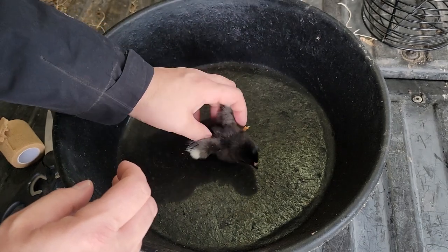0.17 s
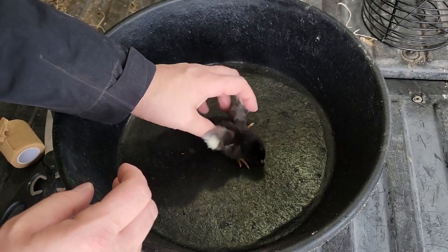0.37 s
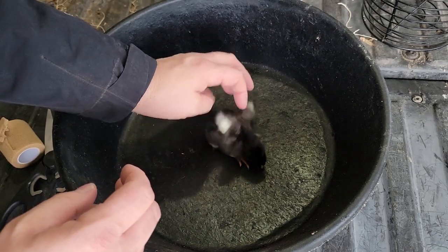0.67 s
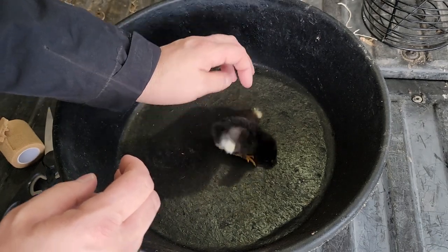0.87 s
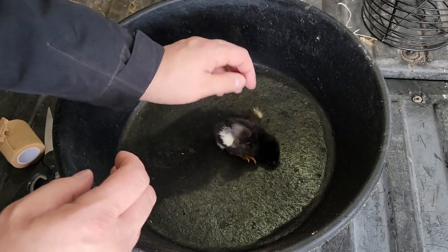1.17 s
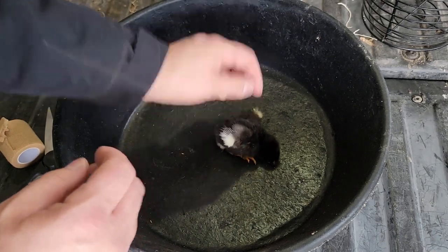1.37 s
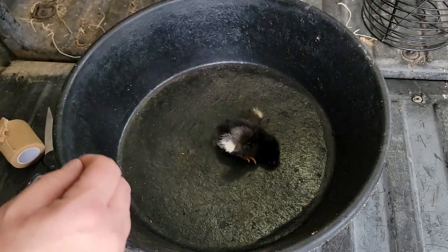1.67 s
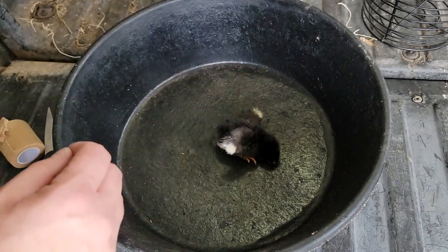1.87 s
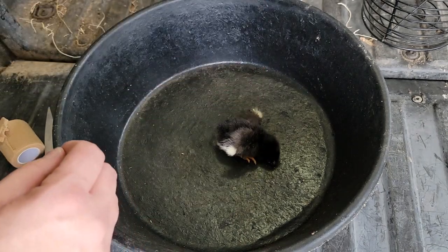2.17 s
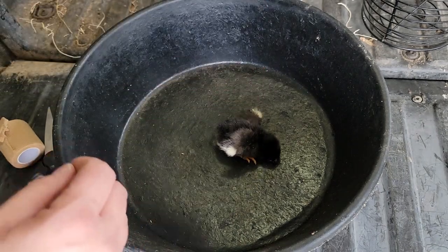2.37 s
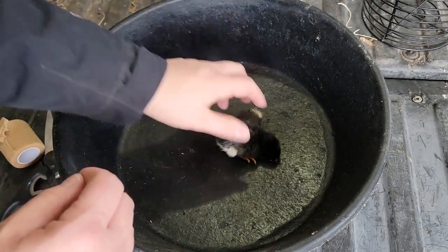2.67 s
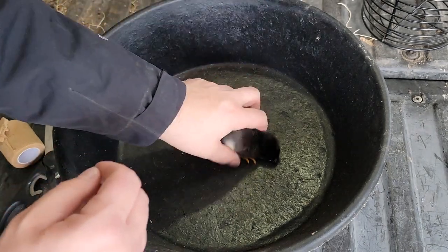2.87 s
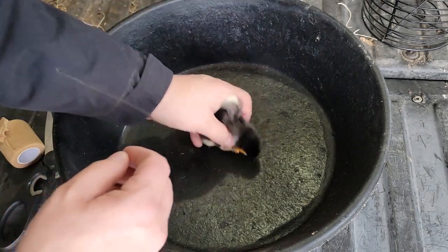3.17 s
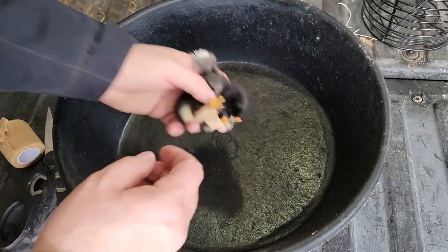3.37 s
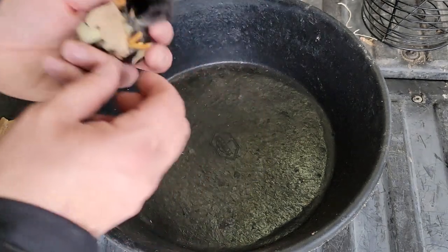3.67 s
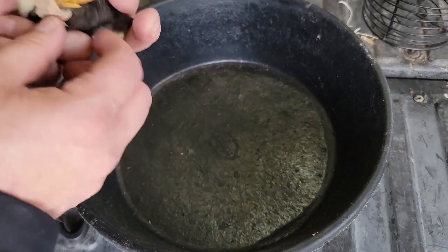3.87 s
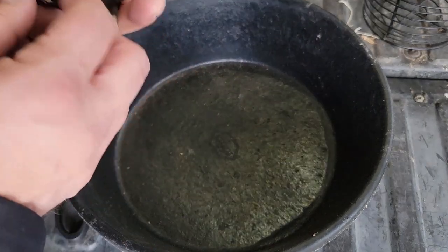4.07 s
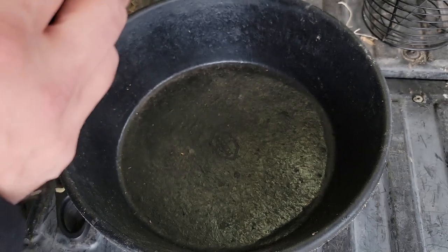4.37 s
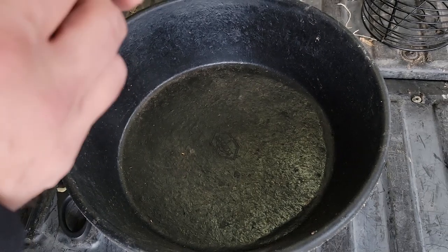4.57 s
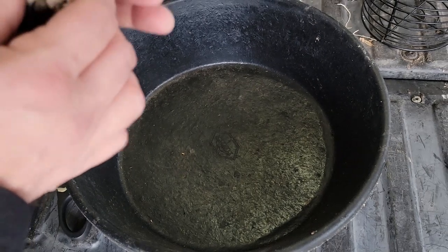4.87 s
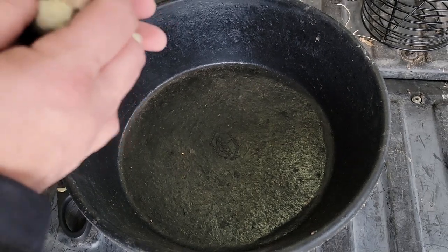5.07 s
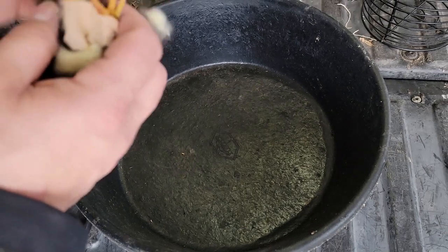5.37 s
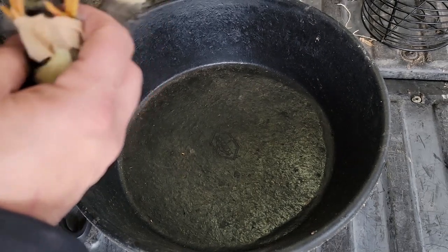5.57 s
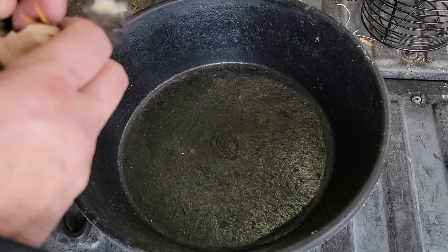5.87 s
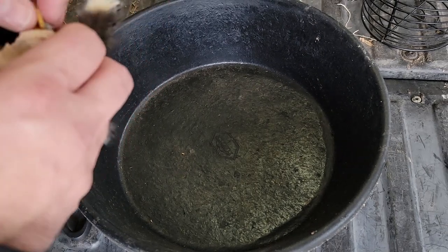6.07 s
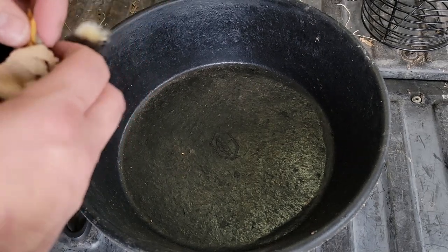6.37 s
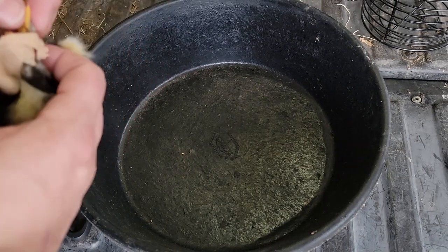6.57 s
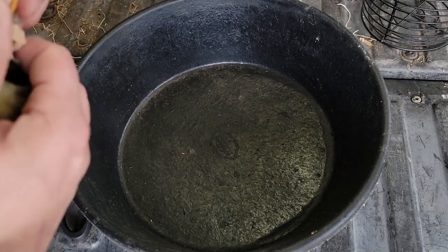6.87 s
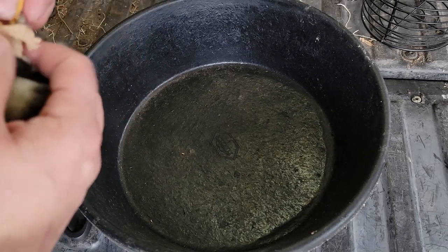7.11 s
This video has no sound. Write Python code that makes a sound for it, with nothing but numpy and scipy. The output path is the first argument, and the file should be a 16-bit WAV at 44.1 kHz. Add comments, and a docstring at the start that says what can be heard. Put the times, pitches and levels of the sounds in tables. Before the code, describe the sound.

A young chick gives short, sharp, falling peeps at uneven intervals, with soft knocks on a rubber tub, light rustling and faint room echo.

```python
"""A young chick peeps in a rubber tub and then in cupped hands, in a small shed, left of a pair of microphone ports.
Each peep is a whistle on a pitch curve, with weak overtones, half-pitch lines and a flutter; faint whistles glide.
Soft knocks on the tub and its stand ring damped modes; rustle, rubbing and bursts of hiss are grainy banded noise.
Rumble, hum, hiss and a faint drone are filtered noise; decaying noise gives the echoes of tub and shed."""
import sys
import numpy as np
from scipy import signal
from scipy.fft import rfft, irfft, next_fast_len
from scipy.io import wavfile
from scipy.ndimage import uniform_filter1d

SR = 44100
rng = np.random.default_rng(int(sys.argv[2]) if len(sys.argv) > 2 else 0)


def master_out(mix):
    """Clip the mix to full scale and print it as 16-bit PCM to the path in sys.argv[1]."""
    frames = np.transpose(np.atleast_2d(mix))
    ceiling = np.clip(frames, -1, 1)
    pcm = np.round(ceiling * 32767).astype(np.int16)
    wavfile.write(sys.argv[1], SR, pcm)


N = 319284
CUTOFF_HZ = 15950   # top of the passed range
RELEASE_S = .004    # tail after the close station


def from_db(db):
    """Gain of a level."""
    return 10 ** (np.asarray(db) / 20)


def rms_one(x):
    """Scaled to rms 1."""
    return x / np.sqrt(np.mean(x ** 2) + 1e-20)


def at_hz(points, hz):
    """A spectrum read on a log-frequency axis."""
    points = np.array(points)
    return np.interp(np.log(hz), np.log(points[:, 0]), points[:, 1])


def drift(hz):
    """Slow chance: noise twice through a one-pole low-pass; spread 1."""
    r = np.exp(-2 * np.pi * hz / SR)
    noise = rng.standard_normal(N + SR)
    return rms_one(signal.lfilter([1], [1, -2 * r, r * r], noise)[SR:])


def panned(x, pan_db):
    """The left keeps the level, the right is weaker."""
    return np.array([x, x * from_db(-pan_db)])


def resonance(x, hz, width_hz):
    """Two-pole band-pass of gain about 1 at its top."""
    r = np.exp(-np.pi * width_hz / SR)
    zeros = (1 - r * r) / 2 * np.array([1, 0, -1])
    return signal.lfilter(zeros, [1, -2 * r * np.cos(2 * np.pi * hz / SR), r * r], x)


def banded(white, spectrum, patchy_db):
    """Narrow bands of a mid and side pair, each with its level, flicker, likeness and balance; rms 1."""
    # left-right likeness: f/Hz, correlation
    likeness = [(60, 0.88), (130, 0.72), (290, 0.065), (640, -0.53), (1410, -0.62), (3100, -0.025),
                (6820, -0.063), (15000, -0.094)]
    # channel balance: f/Hz, left minus right/dB
    balance = [(60, -2), (180, 3.5), (550, 3), (1650, -1), (4970, 1), (15000, 3.5)]
    out, edges_hz = 0, 22 * 2 ** np.arange(0, 9.9, .4)
    flickers = [drift(4.4), drift(4.8), drift(17)]
    for k, (low, high) in enumerate(zip(edges_hz, edges_hz[1:])):
        band = signal.butter(2, [low, high], "band", fs=SR, output="sos")
        mid, side = signal.sosfilt(band, white[k % 2])
        hz = np.sqrt(low * high)
        alike = np.clip(at_hz(likeness, hz), -1, 1)
        lean = from_db(at_hz(balance, hz) / 2)
        gain = from_db(at_hz(spectrum, hz) + patchy_db * flickers[k % 3])
        pair = np.sqrt(1 + alike) * mid + np.sqrt(1 - alike) * side * [[1], [-1]]
        out = out + gain * pair * [[lean], [1 / lean]]
    return rms_one(out)


def hum_and_hiss():
    """Steady floor of the shed: noise bands with a slow flicker."""
    # floor spectrum: f/Hz, density/dB per Hz
    floor = [(12, -37), (20, -5), (85, 3), (261, -15), (335, 3), (431, -22.5), (603, -13.5), (1110, -13),
             (1890, 3.5), (2180, -2.5), (3700, -0.5), (7030, -17.5), (8310, -56.5), (12600, -24.5),
             (15800, -31)]
    return from_db(-57) * banded(rng.standard_normal((2, 2, N)), floor, patchy_db=2.2)


def drone():
    """A narrow band in the hum: noise through one sharp resonance."""
    tone = rms_one(resonance(rng.standard_normal(N), hz=352, width_hz=12))
    return panned(from_db(-78) * tone, 4.0)


def stand_rumble():
    """The stand rumbles: noise through two equal low resonances, alike in both channels."""
    # rumble of the stand: t/s, level/dB
    levels = [(0, -71), (.3, -79), (1.2, -83), (1.6, -68), (2.15, -68), (2.35, -75), (2.95, -70),
              (3.4, -76), (3.8, -69), (4.3, -74), (5.2, -70), (5.4, -75), (5.7, -71), (6.0, -81),
              (6.15, -70), (6.45, -74), (6.95, -82), (7.24, -78)]
    low = resonance(resonance(rng.standard_normal(N), 81, 160), 81, 160)
    return from_db(np.interp(np.arange(N) / SR, *np.transpose(levels))) * rms_one(low)


def rustle_and_rub():
    """Rustle and hiss bursts are noise in dense small grains; rubbing on the tub is coarser and duller."""
    # bursts of rustle and of the hiss heard along with some peeps:
    # crest t/s, rise/s, fall/s, fine-grained level/dB, rubbing level/dB
    bursts = [(0.05, .6, .4, -65, -61), (0.3, .07, .08, -53, -60), (0.54, .2, .09, -60, -60.5),
              (0.83, .2, .1, -61, -65), (1.19, .06, .18, -57, -55), (1.63, .7, .3, -59.5, -50.5),
              (1.731, .17, .15, -47.5, -45.5), (1.94, .12, .5, -57.5, -56), (2.06, .4, .1, -60.5, -56),
              (2.17, .08, 1.1, -58.5, -57.5), (2.35, .5, .4, -62, -54), (2.8, 3.1, 2.1, -64, -59),
              (3.42, 2.1, 1.9, -60.5, -58), (3.81, 1.9, .9, -59.5, -56), (4.9, 1.6, 1.3, -57.5, -61),
              (5.21, .06, .18, -47.5, -61.5), (5.66, .3, .3, -52.5, -57.5), (5.991, .03, .3, -52, -61.5),
              (6.2, .4, .5, -61, -64), (6.46, .012, .24, -46.5, -59), (6.67, .1, .1, -54, -70),
              (6.98, .4, .08, -65.5, -69.5), (7.09, .08, .6, -65, -70)]
    # fine-grained spectrum: f/Hz, density/dB per Hz
    fine_spectrum = [(530, -26), (900, -40), (1580, -45), (2010, 0.5), (2490, -7), (2780, -9), (2980, -3.5),
                     (6660, 3), (8170, -19), (12900, -1), (15800, -4)]
    # rubbing spectrum: f/Hz, density/dB per Hz
    rub_spectrum = [(88, -47), (150, -16), (367, -3.5), (457, -1.5), (514, -1), (939, 1.5), (2070, 1),
                    (5000, -17), (6500, -46), (11000, -120)]
    swish_swing_db, rub_swing_db = 20, 15   # spanned in one rise or fall time
    t, swish_db, rub_db = np.arange(N) / SR, -120, -120
    for crest, rise, fall, fine_db, coarse_db in bursts:   # the strongest of the moment sets the level
        away = np.where(t < crest, (crest - t) / rise, (t - crest) / fall)
        swish_db = np.maximum(swish_db, fine_db - swish_swing_db * away)
        rub_db = np.maximum(rub_db, coarse_db - rub_swing_db * away)
    fine = rng.standard_normal((2, 2, N)) * from_db(1.4 * drift(1200))
    coarse = rng.standard_normal((2, 2, N)) * from_db(1.6 * drift(106))
    swish = from_db(swish_db) * banded(fine, fine_spectrum, patchy_db=1.7)
    return swish + from_db(rub_db) * banded(coarse, rub_spectrum, patchy_db=3.5)


def knocks():
    """Each blow rings the modes around the pitch that its hardness favours; flesh spreads the contact over two cycles."""
    # blows: t/s, nominal level/dB, most excited f/Hz (hardness)
    blows = [(0.738, -47, 2130), (0.788, -53, 266), (1.186, -56, 1120), (1.218, -60, 325),
             (1.533, -38, 1950), (1.578, -41, 573), (1.64, -39, 695), (1.647, -42, 740),
             (1.701, -38.5, 565), (1.709, -51, 520), (1.74, -31.5, 1980), (1.746, -34, 2210),
             (1.922, -45, 209), (2.056, -52, 2170), (2.259, -47.5, 246), (2.321, -45, 590),
             (2.354, -40, 2110), (2.491, -41.5, 1920), (2.718, -58, 134), (2.907, -43, 397),
             (2.958, -47, 71.6), (3.508, -58, 2480), (3.789, -27, 2600), (3.839, -51, 231),
             (4.09, -56, 350), (4.289, -41.5, 1830)]
    # modes of the tub and its stand: f/Hz, nominal level/dB, t60/s
    modes = [(75, 0, .3), (110, -2, .25), (200, 0, .12), (365, 0, .06), (430, 0, .04), (520, 0, .04),
             (735, 0, .03), (950, -4, .015), (1250, -4, .012), (1600, -2, .012), (2080, 0, .015),
             (2630, -1, .012), (3400, -5, .008), (4600, -9, .006), (6500, -13, .005)]
    s, blow_db, hard_hz = np.transpose(blows)
    at, out = (s * SR).astype(int), np.zeros(N)
    chance_db = rng.normal(0, 2.0, (len(s), len(modes)))
    for k, (hz, mode_db, t60) in enumerate(modes):
        octaves_off = np.abs(np.log2(hz / hard_hz))
        clicks = np.full(N, 1e-18)
        clicks[at] = from_db(blow_db + mode_db + chance_db[:, k] - 14.0 * octaves_off)
        r, w = from_db(-60 / (t60 * SR)), 2 * np.pi * hz / SR
        cycles = np.arange(int(2 * SR / hz))
        contact = np.hanning(len(cycles)) * np.cos(w * cycles) * 2 * hz / SR
        push = signal.oaconvolve(clicks, contact)[:N]
        out += signal.lfilter([0, np.sin(w)], [1, -2 * r * np.cos(w), r * r], push)
    return panned(out, 4.0)


def faint_whistles():
    """Short rough glides under a smooth swell: the direct part, and the feed that only arrives as echo."""
    # the end of a peep before the start, the chick's second voice, or farther chicks:
    # start t/s, end t/s, start f/Hz, end f/Hz, direct level/dB, echo feed level/dB, roughness (0-1)
    glides = [(0.0, 0.008, 3970, 3790, -39, -25.5, 0.33), (0.0, 0.013, 5300, 5200, -50, -36.5, 0.24),
              (0.195, 0.25, 4650, 5200, -58, -36.5, .4), (2.76, 2.902, 4400, 4000, -79, -42, 0.6),
              (3.0, 3.054, 4000, 3750, -53, -48, 0.8), (3.04, 3.092, 4100, 3020, -51, -46.5, 0.65),
              (3.079, 3.105, 2630, 2520, -52, -48.5, 0.4), (3.075, 3.101, 5300, 4970, -54, -48.5, 0.4),
              (4.04, 4.126, 4780, 3970, -61, -44.5, 0.64), (4.29, 4.391, 4860, 3740, -56, -40.5, .5),
              (5.598, 5.645, 3070, 3450, -37, -41.5, 0.65), (6.14, 6.202, 6620, 7200, -47.5, -40.5, .6),
              (6.13, 6.204, 3805, 3580, -46.5, -28.5, 0.82), (6.586, 6.632, 6350, 6120, -45.5, -44.5, .2),
              (6.87, 7.01, 5140, 3580, -56.5, -40, .5), (7.09, 7.148, 5300, 4040, -60, -49.5, 0.65),
              (7.185, 7.223, 5330, 5320, -53.5, -37.5, 0.13)]
    direct, echo, grit, waver = np.zeros(N), np.zeros(N), drift(380), drift(140)
    for start, end, from_hz, to_hz, level_db, echo_db, rough in glides:
        at = np.arange(round(max(start, 0) * SR), min(round(end * SR), N))
        hz = np.linspace(from_hz, to_hz, len(at)) * (1 + .05 * rough * waver[at])
        swell = np.sqrt(np.hanning(len(at)))
        glide = np.sin(2 * np.pi * np.cumsum(hz) / SR) * (1 + rough * grit[at]) * swell
        direct[at] += from_db(level_db) * glide
        echo[at] += from_db(echo_db) * glide
    return direct, echo


def peep_shape(times, pitches, arch_hz, levels_db):
    """Samples, pitch and level of a peep or part of one, walked from station to station."""
    open_under_db, release_db = 22, 25   # opening below the swell station; drop after the close
    ease = 1.6   # the first leg and the pitch of the third move fast at first, then settle
    end_s = times[-1] + RELEASE_S
    at = np.arange(round(times[0] * SR), round(end_s * SR))
    place = np.interp(at / SR, [*np.maximum.accumulate(times), end_s], np.arange(6))
    leg, share = np.divmod(place, 1)
    eased = leg + 1 - (1 - share) ** ease
    hz = np.interp(np.where(leg % 2 == 0, eased, place), np.arange(5), pitches)
    hz = hz + arch_hz * np.sin(np.pi * share) * (leg == 1)
    stations_db = [levels_db[0] - open_under_db, *levels_db, levels_db[-1] - release_db]
    level_db = np.interp(np.where(leg == 0, eased, place), np.arange(6), stations_db)
    return at, hz, level_db


def chick():
    """A whistle with weak overtones; uneven cycles add lines at half pitch, a flutter chops level and bends pitch."""
    # peeps and parts of peeps, each walked through five stations: open, swell, break, crest, close:
    # t/s at the five; nominal f/Hz at the five; pitch arch from swell to break/Hz;
    # level/dB at swell, break, crest, close; left minus right at 4 kHz/dB, extra lag of the right/us,
    # octave gain/dB, change of balance/dB per kHz
    peeps = [ (0.243, 0.258, 0.268, 0.276, 0.283, 5500, 5720, 5680, 5560, 5500, 10, -39, -34, -34, -36, 3, -160, -4.5, 6),
             (0.283, 0.292, 0.302, 0.314, 0.336, 5350, 5080, 4680, 4230, 3050, 10, -26, -25.5, -26, -40, 3, -160, -4.5, 6),
             (0.483, 0.516, 0.532, 0.543, 0.565, 5620, 5180, 4750, 4000, 2880, 40, -33, -38, -25, -32, 14, 60, 1, -3),
             (0.8, 0.835, 0.862, 0.872, 0.881, 5600, 5450, 5250, 4500, 3620, 70, -38, -35, -35, -33, 4, 75, -6, -4.5),
             (1.012, 1.05, 1.075, 1.086, 1.098, 5470, 5470, 5480, 4330, 3150, 10, -35, -33, -25, -25, 12, -190, -5.5, -6),
             (3.106, 3.128, 3.171, 3.181, 3.192, 3900, 5000, 5020, 3900, 3680, 80, -44, -39, -27, -34, 2.5, -185, -8, 3.5),
             (3.452, 3.463, 3.5, 3.511, 3.519, 5750, 5880, 5230, 4650, 4650, -280, -31, -28, -18, -27, 12.5, -180, -4, -5.5),
             (3.519, 3.524, 3.529, 3.532, 3.538, 4700, 4950, 5250, 5150, 4800, 10, -30, -34, -38, -50, 12.5, -180, -4, -5.5),
             (4.4, 4.432, 4.516, 4.527, 4.533, 5850, 5430, 5600, 4050, 4020, 50, -32, -35, -24, -26, 6.5, 25, -7, -4.5),
             (4.533, 4.543, 4.55, 4.557, 4.561, 4200, 5300, 5100, 3600, 3250, 40, -39, -42, -30, -32, 6.5, 25, -7, -4.5),
             (4.758, 4.775, 4.785, 4.791, 4.798, 5620, 5560, 5600, 5560, 5480, 10, -40, -33, -28, -36, 7.5, -25, 0, 0),
             (4.794, 4.812, 4.876, 4.898, 4.911, 5480, 5430, 5320, 3490, 2880, 270, -33.5, -36, -18, -26, 7, -25, 0, 0),
             (5.134, 5.162, 5.175, 5.19, 5.197, 5400, 5140, 5330, 5420, 5430, 10, -24, -24, -28, -31, 3, -30, -5.5, 3.5),
             (5.2, 5.204, 5.232, 5.246, 5.257, 5300, 5260, 5100, 3680, 2880, 30, -27, -30, -12.5, -23, 5.5, -30, -5.5, 3.5),
             (5.603, 5.616, 5.643, 5.655, 5.663, 5400, 5300, 5230, 5320, 5420, 10, -29, -25, -26, -28, 7.5, 25, -5.5, 0),
             (5.666, 5.671, 5.693, 5.712, 5.727, 5250, 5180, 4970, 3800, 4020, 40, -24, -25, -17, -23, 7.5, 25, -10, 0),
             (5.725, 5.729, 5.731, 5.734, 5.738, 4050, 4060, 3850, 3400, 3070, 10, -25, -24, -25, -30, 7.5, 25, -10, 0),
             (6.116, 6.128, 6.196, 6.207, 6.222, 6250, 6330, 5450, 3720, 2700, -360, -47, -43, -20, -27, 9, 45, 3.5, -2),
             (6.583, 6.607, 6.654, 6.666, 6.687, 5900, 5550, 5450, 4060, 2850, 120, -48, -43, -29, -35, 11, 30, 5, 6),
             ]
    # flutter: start t/s, end t/s, nominal rate/Hz, depth (0-1)
    flutters = [(0.262, 0.287, 280, .5), (0.515, 0.552, 200, .5), (1.08, 1.1, 190, .3),
                (3.12, 3.18, 200, .4), (3.45, 3.506, 230, .8), (3.518, 3.545, 260, .8),
                (4.468, 4.522, 230, .7), (4.84, 4.88, 220, .4), (4.895, 4.912, 300, .3),
                (5.125, 5.15, 250, .6), (5.2, 5.238, 215, .9), (5.605, 5.662, 180, .9),
                (5.668, 5.706, 170, .8), (6.12, 6.198, 200, .6), (6.2, 6.222, 150, .6),
                (6.59, 6.65, 300, .5)]
    # uneven cycles: start t/s, end t/s, half-pitch level/dB
    halves = [(0.512, 0.525, -51), (0.538, 0.552, -45), (1.04, 1.07, -60), (1.084, 1.092, -49),
              (3.138, 3.155, -50), (3.472, 3.506, -41), (4.42, 4.521, -48), (4.793, 4.884, -41),
              (4.892, 4.907, -43), (5.13, 5.156, -41), (5.176, 5.187, -44), (5.241, 5.256, -46),
              (5.608, 5.675, -46), (5.704, 5.724, -54)]
    # octave against the whistle: octave f/Hz, level/dB
    octave = [(5500, -28.5), (7000, -16), (7700, -33), (8300, -34), (9500, -28), (10500, -19), (11500, -33)]
    out, t = np.zeros((2, N)), np.arange(N) / SR
    depth, beats_hz, uneven = np.zeros(N), np.zeros(N), np.zeros(N)
    for start, end, rate_hz, deep in flutters:
        inside = (t > start) & (t < end)
        depth[inside], beats_hz[inside] = deep, rate_hz
    for start, end, level_db in halves:
        at = np.arange(round(start * SR), round(end * SR))
        uneven[at] = from_db(level_db) * signal.windows.tukey(len(at), .4)
    depth = uniform_filter1d(depth, size=150)
    flutter = 2 * np.pi * np.cumsum(beats_hz * from_db(1.477 * drift(51.5))) / SR
    grit = drift(750)
    beads = np.clip(1.2 * np.cos(flutter / 2) ** 4 + .12 * grit, 0, 1)
    chop = 1 - depth * (beads - .35)   # short gaps between longer beads
    bend = 1 + 0.021 * depth * (np.sin(flutter) + 0.44 * grit) + 0.006 * drift(170)
    for row in peeps:
        at, hz, level_db = peep_shape(row[:5], row[5:10], row[10], row[11:15])
        pan_db, lag_us, octave_db, tilt_db = row[15:]
        turn = 2 * np.pi * np.cumsum(uniform_filter1d(hz, size=130) * bend[at]) / SR
        half = np.sin(turn / 2) + from_db(-15) * np.sin(3 * turn / 2) + from_db(-23) * np.sin(5 * turn / 2)
        half = uneven[at] * (1 + .3 * grit[at]) * half
        second = from_db(octave_db + at_hz(octave, 2 * hz)) * np.sin(2 * turn)
        third = from_db(-41.5) * np.sin(3 * turn) * (3 * hz < CUTOFF_HZ)
        whistle = from_db(level_db) * (np.sin(turn) + second + third)
        voice = np.sqrt(2) * chop[at] * signal.windows.tukey(len(at), .08) * (whistle + half)
        out[0, at] += voice
        right_at = at + round(lag_us * SR / 10 ** 6)
        out[1, right_at] += from_db(-pan_db - tilt_db * (hz - 4000) / 1000) * voice   # balance turns with pitch
    return out


def echoes(x, t60_s, delay_s):
    """Dense reflections: noise that dies away, another draw for each ear; walls swallow the treble."""
    t = np.arange(SR) / SR
    tail = rng.standard_normal((2, SR)) * from_db(-60 * t / t60_s) * (t > delay_s)
    tail = signal.lfilter(*signal.butter(2, 5450, fs=SR), tail)   # low-pass/Hz
    tail = tail / np.sqrt(np.sum(tail ** 2) / 2)
    return signal.fftconvolve(x[None], tail, axes=1)[:, :N]


def ports(x):
    """Near sounds reach the left port first: the right trails by a phase that depends on pitch."""
    # lead of the left port: f/Hz, phase/rad
    lead = [(0, 0), (690, 2.8), (1810, 3.4), (2760, 5.5), (4820, 12.3), (5600, 15.7), (16000, 45)]
    size = next_fast_len(N + 999)
    bins_hz = np.arange(size // 2 + 1) * SR / size
    turn = np.exp(-1j * np.interp(bins_hz, *np.transpose(lead)))
    return np.array([x[0], irfft(rfft(x[1], size) * turn, size)[:N]])


def scene():
    """Near sources through the ports, their echoes in tub and shed, and the steady floor."""
    in_tub_db, in_hands_db, lifted_s = -12, -22, 3.35   # close echoes weaken once the chick is lifted out
    background = hum_and_hiss() + drone() + stand_rumble() + rustle_and_rub()
    blows = knocks()   # no port lag: they reach both ports together
    direct, echo = faint_whistles()
    near = chick() + panned(direct, 7.5)
    close = from_db(np.where(np.arange(N) / SR < lifted_s, in_tub_db, in_hands_db)) * near[0]
    shed = from_db(-20.5) * echoes(near[0] + blows[0] + echo, t60_s=0.54, delay_s=0.0043)
    wet = shed + echoes(close, t60_s=.04, delay_s=0.00098)
    return background + blows + ports(near) + wet * from_db([[1.5], [-1.5]])


def record(dry):
    """The microphone dips in the treble; the top is cut steeply."""
    coloured = dry - 0.75 * resonance(dry, hz=8050, width_hz=500)
    steep = signal.ellip(12, .3, 70, CUTOFF_HZ - 130, fs=SR, output="sos")
    return signal.sosfilt(steep, coloured)


dry = scene()
out = record(dry)
master_out(out)
```